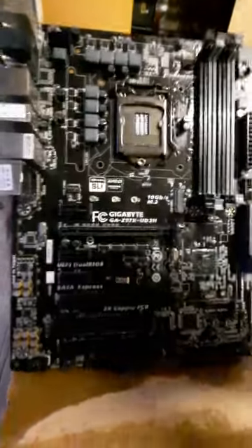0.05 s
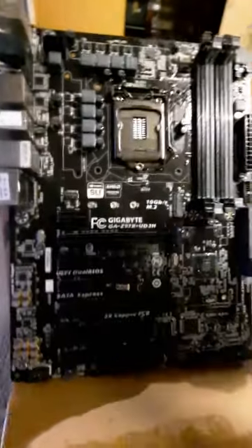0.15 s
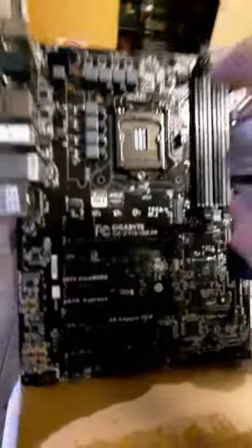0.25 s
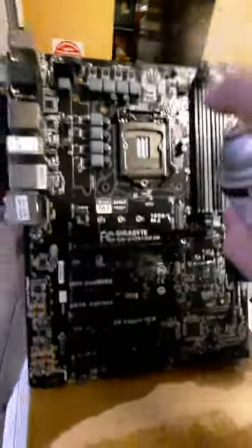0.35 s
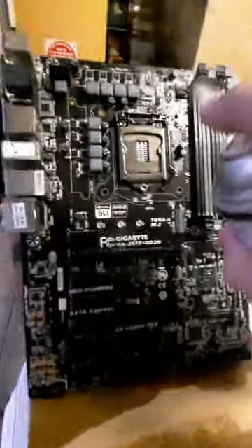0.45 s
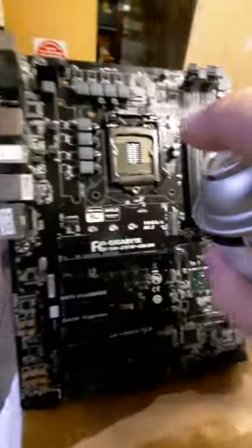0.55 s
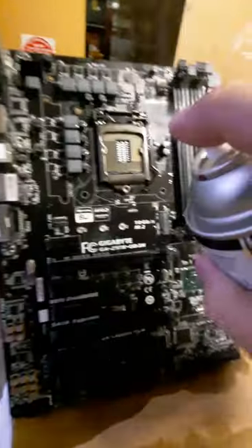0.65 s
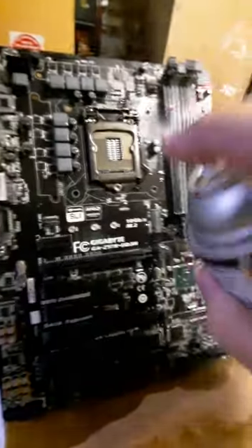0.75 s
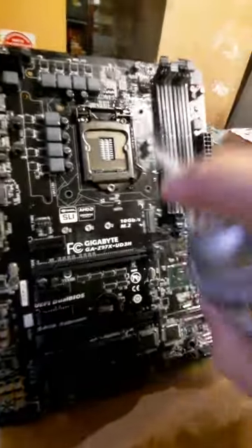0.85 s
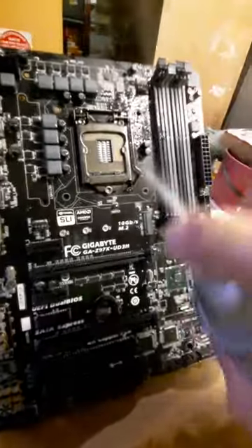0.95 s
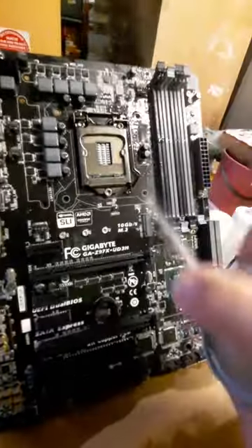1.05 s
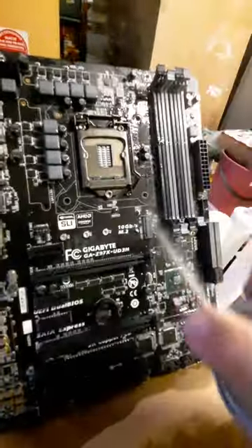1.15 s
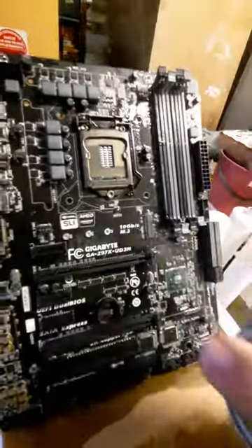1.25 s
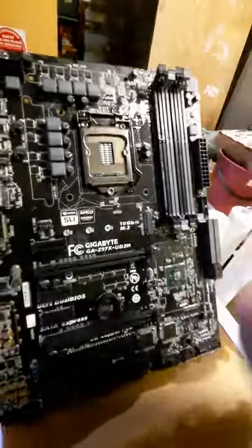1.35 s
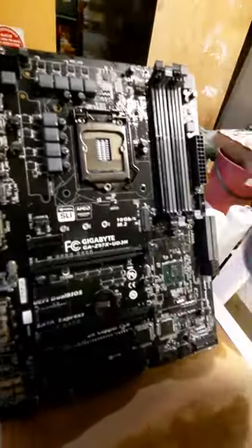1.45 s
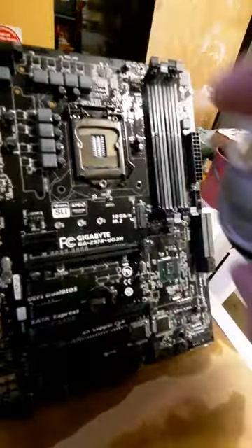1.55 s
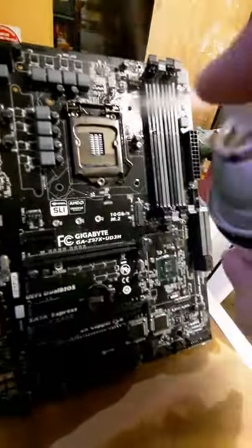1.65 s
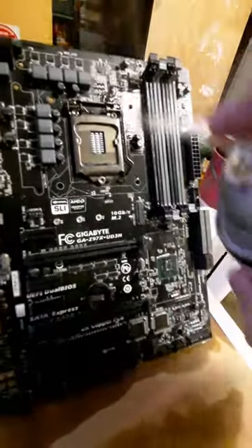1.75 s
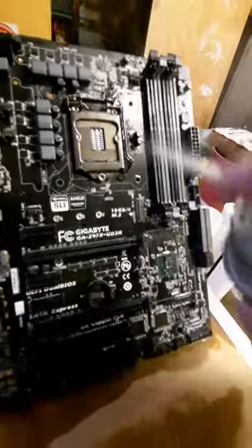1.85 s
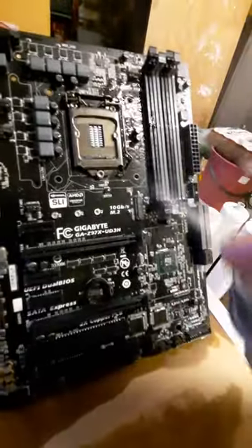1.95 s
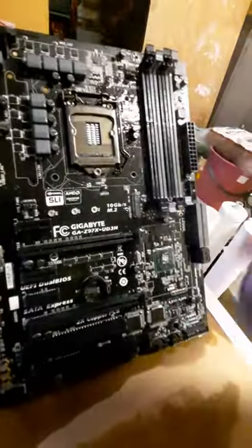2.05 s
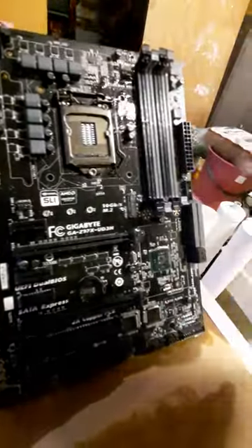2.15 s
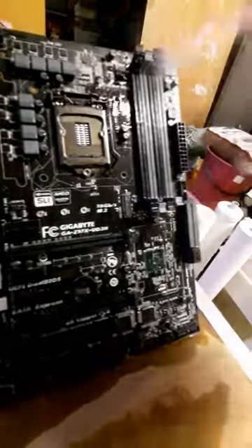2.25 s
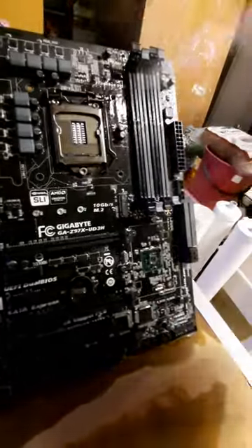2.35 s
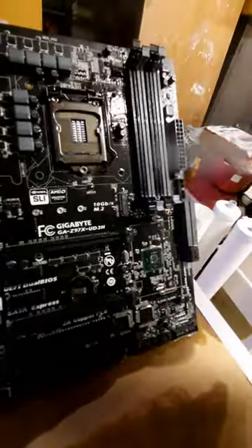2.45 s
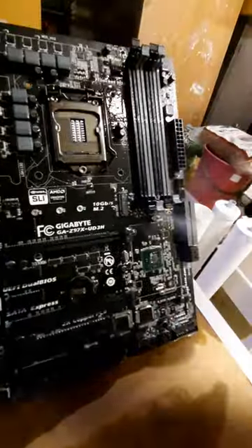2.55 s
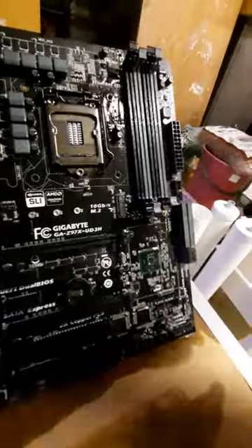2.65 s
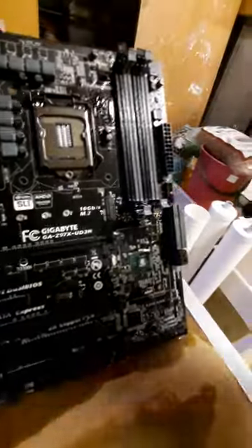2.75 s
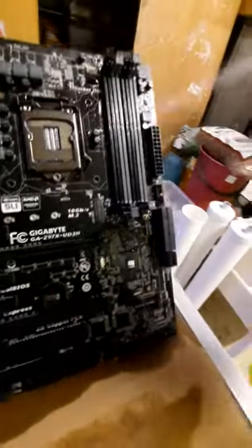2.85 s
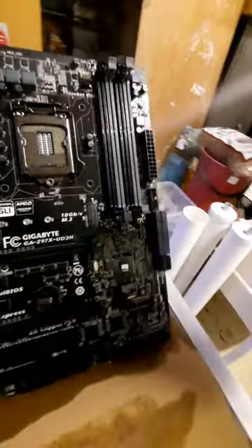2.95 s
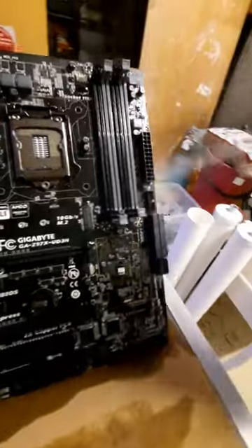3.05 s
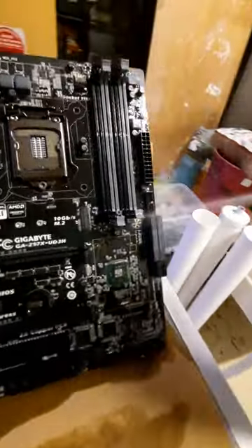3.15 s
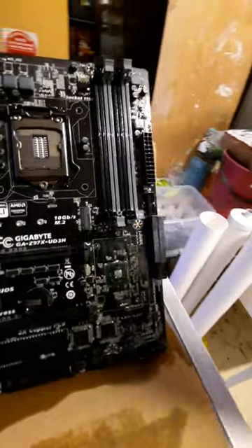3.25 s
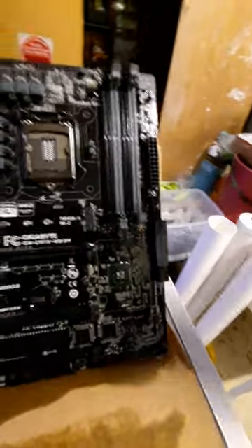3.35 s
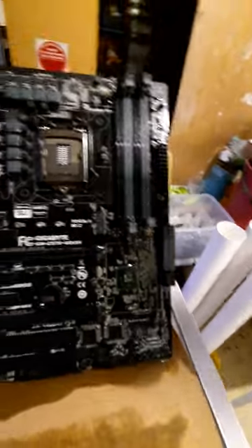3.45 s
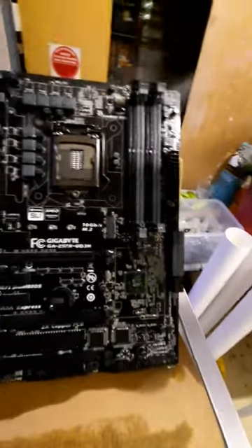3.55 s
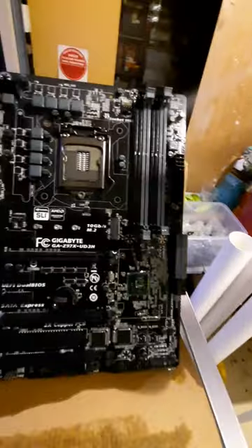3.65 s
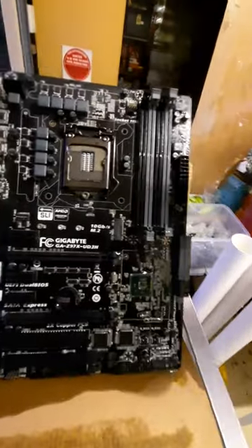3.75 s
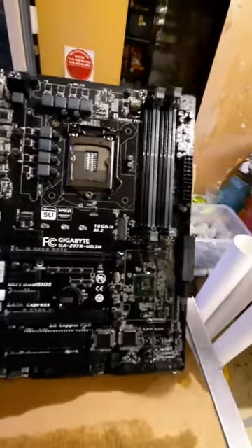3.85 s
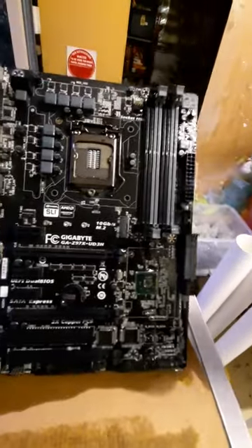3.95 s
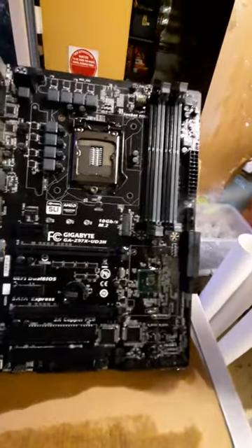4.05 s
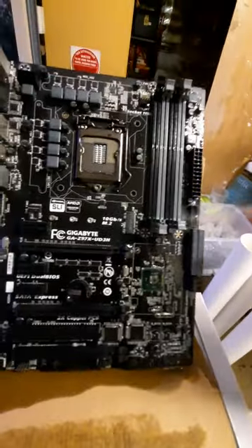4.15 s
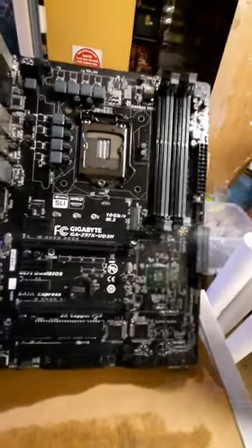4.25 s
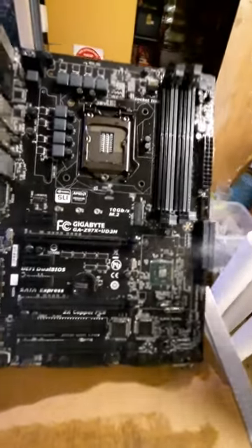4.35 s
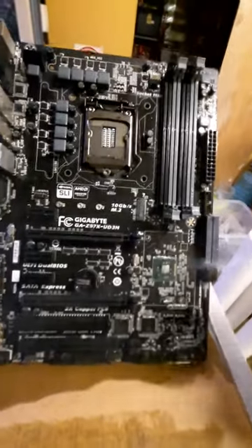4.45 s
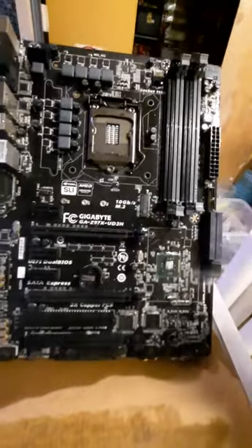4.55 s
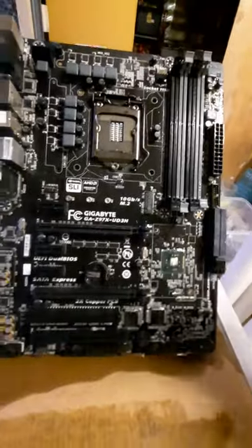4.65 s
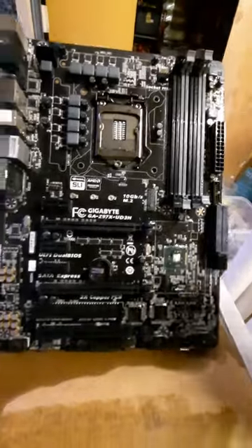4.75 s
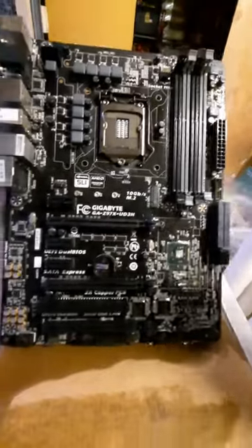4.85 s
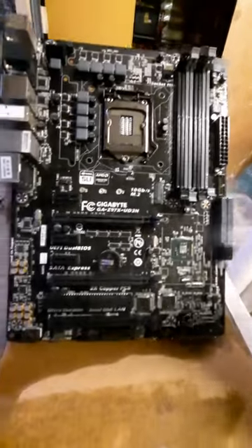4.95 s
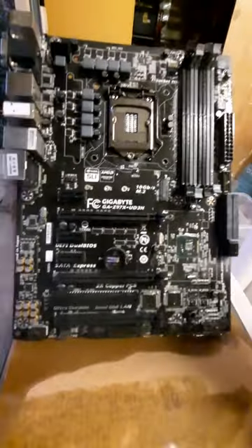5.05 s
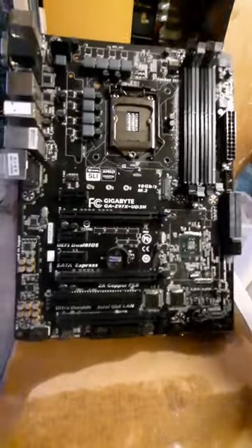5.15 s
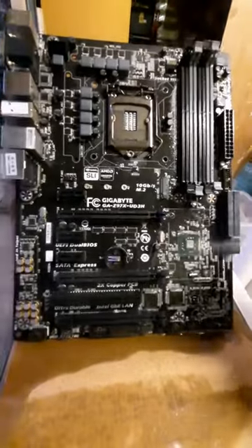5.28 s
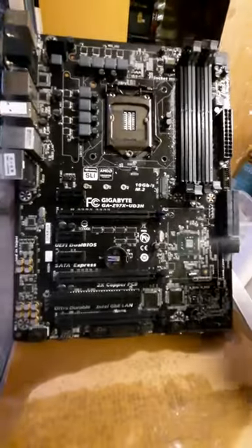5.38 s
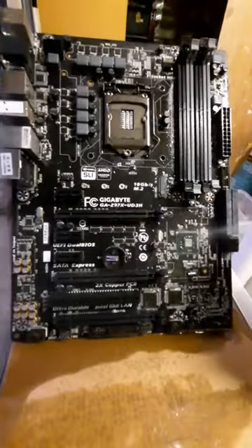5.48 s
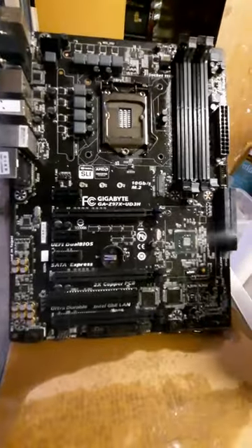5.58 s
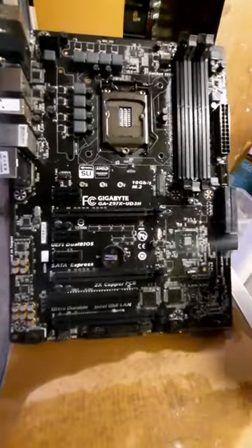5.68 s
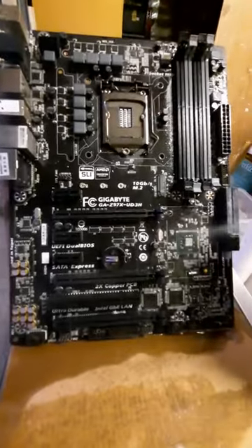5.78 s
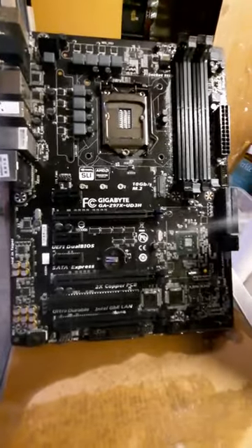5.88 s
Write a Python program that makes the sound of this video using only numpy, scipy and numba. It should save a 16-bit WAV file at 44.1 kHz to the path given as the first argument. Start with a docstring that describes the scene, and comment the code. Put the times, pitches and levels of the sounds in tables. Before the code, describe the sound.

A pressurised can sprays a circuit board in bright, breathy bursts with abrupt stops, light button ticks and faint bird-like whistles in a quiet room.

```python
"""In a small room, an aerosol cleaner is sprayed onto a circuit board in seven bursts, close to a phone.
Filtered noise forms the nozzle hiss, the rush over the parts, the slot tone and the rumble; two resonances drone.
Moving echoes comb the spray. Damped resonances tick and bump as the button, can and hands move.
Thin gliding tones whistle between and during bursts, perhaps a bird outside.
Soft coloured noise, a low hum and a faint fizz from the wet board lie beneath."""
import sys
import numpy as np
from scipy import signal
from scipy.fft import rfft, irfft
from scipy.io import wavfile
from scipy.ndimage import map_coordinates
from numba import njit

SR = 44100
rng = np.random.default_rng(int(sys.argv[2]) if len(sys.argv) > 2 else 0)


def store_pcm(level_fs):
    """Save levels as 16-bit WAV."""
    pcm = np.round(np.clip(level_fs, -1, 1) * 32767).astype(np.int16)
    wavfile.write(sys.argv[1], SR, np.atleast_2d(pcm).T)


N = 261072
TIME = np.arange(N) / SR  # [s]
FREQ = np.maximum(np.arange(N // 2 + 1) * SR / N, 1)  # [Hz]

# Button strokes; levels (before the layer trims in spray) and pitches are those at mid-stroke:
# (opens [s], closes [s], rise time [s], fall time constant [s], nozzle hiss [dB], hiss swell over the stroke [dB],
#  rush on the board [dB], rush swell [dB], hollow tone of the slots [dB], slots swell [dB], rumble [dB],
#  drone of the board [dB], hiss left minus right [dB], hiss centre [Hz], hiss glide over the stroke [Hz],
#  rush centre [Hz], slots centre [Hz])
STROKES = [(0.26, 1.256, 0.05, 0.013, -29.5, 6, -31, 6, -45.5, 4, -51.5, -55.5, 0.4, 12730, 600, 6300, 2130),
           (1.58, 2.026, 0.021, 0.015, -28.5, 2.5, -29.5, -2.5, -49, 8, -45, -51, 4, 12550, -800, 6100, 2750),
           (2.251, 2.587, 0.015, 0.017, -29, 3, -30.5, -3.5, -47, 3, -49.5, -55.5, 2, 13200, -1200, 6050, 2300),
           (2.869, 3.197, 0.018, 0.017, -30, 2.5, -34, -1.5, -49, 4.5, -52.5, -49.5, -1.5, 11700, -400, 5300, 2620),
           (3.551, 4.589, 0.0097, 0.014, -29, 3.5, -35, -2, -47.5, 6, -57, -53, -1.5, 11350, -500, 5400, 2530),
           (4.833, 5.073, 0.011, 0.015, -30.5, -0.5, -37, 6, -48, 9.5, -54.5, -52, -2, 12600, -300, 5070, 1950),
           (5.224, 6.02, 0.012, 0.014, -28.5, 2.5, -36.5, 0, -48, -1.5, -54.5, -55.5, 1.5, 12500, 0, 6300, 2690)]
# Colour of the spray: (frequency [Hz], left gain [dB], right gain [dB])
SPRAY_COLOUR = [(131, -22.5, -41), (322, -16.5, -21), (693, -7, -12.5), (1095, -11, -14.5),
                (1830, -3.5, -5), (3880, -6, -5.5), (4830, -12, -10), (6140, -20, -7), (8230, -33, -9.5),
                (9420, -34.5, -14), (11080, -20.5, -5.5), (11600, -29, -3), (12150, -15.5, -7),
                (15400, -11.5, -2.5)]
# The jet crosses a hollow between the parts and the rumble surges: (time [s], lift [dB], half length to 1/e [s])
RUMBLE_SURGES = [(0.669, 10, 0.23), (1.075, 10.5, 0.15), (2.586, 5, 0.028), (3.04, 5.5, 0.084),
                 (3.193, 11, 0.062), (4.1, 12, 0.45), (4.894, 5.5, 0.11), (5.5, 1, 0.037)]
# The nozzle swings and the hiss flares towards the phone or dips: (time [s], lift [dB], half length to 1/e [s])
HISS_FLARES = [(0.95, 3.5, 0.13), (2.51, 2.5, 0.029), (3.575, -2, 0.0069), (4.56, 4, 0.022),
               (4.99, 4.5, 0.098), (5.248, -2, 0.0095)]
# Path difference between the microphone ports: (time [s], later arrival at the right port [s])
PORT_LAGS = [(.3, 0.00026), (2.5, 0.00024), (3.6, 0.00019), (5.9, 0.000023)]
# Ticks of the button and can, before panning:
# (time [s], level [dB], ring [Hz], t60 [s], half-width as a share of the ring frequency [0-1])
BUTTON_TICKS = [(.061, -49, 6900, 0.027, 0.15), (1.364, -57, 8000, 0.02, 0.5),
                (2.160, -66, 7000, 0.015, 0.5), (2.242, -57, 7000, 0.02, 0.46),
                (2.710, -58, 7000, 0.015, 0.5), (2.848, -57, 5600, 0.028, 0.3),
                (2.880, -35, 11100, 0.0089, 0.4), (3.348, -56, 6000, 0.011, 0.6),
                (3.470, -63, 10500, 0.04, 0.4), (3.480, -55, 5600, 0.063, 0.28),
                (3.536, -45, 5000, 0.0079, 0.2), (4.821, -57, 8700, 0.025, 0.6),
                (5.213, -56, 5140, 0.019, 0.3)]
# Soft handling bumps: (time [s], level [dB], ring [Hz], t60 [s], half-width as a share of the ring frequency [0-1])
HANDLING_BUMPS = [(.022, -44.5, 272, 0.3, 0.77), (.44, -54, 64, 0.45, 0.49)]
# Whistles, before panning: (airy share [0-1], drift rate of the air [1/s], path of (time [s], pitch [Hz], level [dB]))
WHISTLE_PATHS = [(0.66, 200, [(2.595, 1790, -44), (2.635, 1940, -42.5), (2.665, 2120, -46),
                 (2.71, 2080, -56), (2.78, 1700, -63)]), (0.8, 170, [(2.61, 2500, -61), (2.652, 2430, -50),
                 (2.69, 2400, -64)]), (0.46, 230, [(3.20, 1480, -53), (3.30, 1494, -54),
                 (3.43, 1530, -68)]), (0.049, 380, [(3.33, 3070, -61), (3.38, 3135, -48), (3.40, 3120, -48),
                 (3.425, 3150, -45.5), (3.485, 3200, -54), (3.50, 3220, -41), (3.515, 3240, -54),
                 (3.565, 3260, -54)]), (0.25, 220, [(3.90, 2560, -52), (3.965, 2535, -45),
                 (3.995, 2440, -37), (4.04, 2365, -33), (4.065, 2385, -37), (4.09, 2460, -35),
                 (4.122, 2530, -42), (4.155, 2475, -33), (4.20, 2270, -38), (4.24, 2140, -46)]),
                 (0.95, 420, [(4.21, 2480, -40), (4.35, 2350, -48.5), (4.47, 2295, -39.5),
                 (4.57, 2280, -50), (4.68, 2320, -48), (4.76, 2330, -60)]), (0.27, 190, [(4.53, 2440, -50),
                 (4.578, 2565, -37), (4.603, 2470, -39.5), (4.65, 2532, -38.5), (4.70, 2484, -44.5),
                 (4.75, 2545, -49), (4.77, 2520, -62), (4.89, 2540, -62)])]
# Colour of the room noise: (frequency [Hz], left gain [dB], right gain [dB])
ROOM_COLOUR = [(25, -33, -22), (65, -6.5, -6), (195, -22, -43), (293, -2.5, 0.5), (610, -4, -7),
               (910, 1, -2.5), (2140, -4.5, -2), (3160, -9, -17), (6300, -24.5, -13.5), (9700, -62, -22.5),
               (11900, -48, -20.5), (15600, -52, -27)]
# Room noise before a -2 dB trim: (time [s], level [dB])
ROOM_NOISE_LEVEL = [(0, -44), (.2, -46), (1.33, -44.5), (1.41, -45), (1.55, -46.5), (2.2, -47),
                    (2.76, -48.5), (2.83, -46), (3.3, -47.5), (3.52, -47.5), (4.2, -44), (4.75, -53),
                    (5.2, -51), (5.92, -53.5)]

# The hand is never quite still: drift rate [1/s] and spread of the two centres [Hz]
WANDER_PER_S, HISS_WANDER_HZ, RUSH_WANDER_HZ = 11, 250, 130
# Over each stroke the hand closes in: the rush rises and the slots sink in pitch
RUSH_GLIDE_HZ, SLOTS_GLIDE_HZ = 500, -250
SHIMMER_DB, SHIMMER_PER_S, SHIMMER_BAND_HZ = 1.6, 30, 550
# Resonance widths here are half-widths at -6 dB
DRONE_HZ, DRONE_WIDTH_HZ = 316, 51
BODY_HZ, BODY_WIDTH_HZ, BODY_DB = 137, 146, -8  # deep body of the drone, level relative to its main ring
DRONE_SURGE_SHARE = 0.81  # how much of a surge, in dB, reaches the drone
WHISTLE_WAVER_HZ, WHISTLE_WAVER_PER_S, WHISTLE_FLUTTER_DB = 7, 90, 1.2
WHISTLE_EDGE_S = 0.016
HUM_HZ, HUM_WIDTH_HZ, HUM_DB = 141, 35, -68
FIZZ_DB, FIZZ_DRY_DB_PER_S = -82, 26  # before panning; the fizz weakens as the board dries after each burst
ROOM_T60_S, ROOM_DB = 0.24, -20.5
TOP_HZ = 15800


def spray(flutter_db=0.08, spit_db=0.5, churn_db=1.8, sway_db=0.9):
    """Turbulence: gas hisses at the nozzle, rushes over the parts, blows across the slots and rumbles on the board."""
    _, place, settings = strokes()
    (hiss_db, hiss_swell, rush_db, rush_swell, slots_db, slots_swell, rumble_db, drone_db, aim_db,
     hiss_hz, hiss_glide_hz, rush_hz, slots_hz) = settings
    surge_db = bumps(RUMBLE_SURGES)
    hiss_hz = hiss_hz + hiss_glide_hz * place + HISS_WANDER_HZ * walk(WANDER_PER_S)
    rush_hz = rush_hz + RUSH_GLIDE_HZ * place + RUSH_WANDER_HZ * walk(WANDER_PER_S)
    slots_hz = slots_hz + SLOTS_GLIDE_HZ * place
    hiss_db = hiss_db + hiss_swell * place + bumps(HISS_FLARES) + sway_db * walk(WANDER_PER_S)

    lag_s, = curves(PORT_LAGS)
    left, right = stereo_noise(600, shared=.45)
    combed = np.array([near_surfaces(left), near_surfaces(delay(right, lag_s))])
    gas = rfft(colour(combed, SPRAY_COLOUR))
    # differences of low-pass gains leave four adjoining bands
    bands = np.diff([below(143), below(1770), below(4710), below(7700), np.ones_like(FREQ)], axis=0)
    rumble, slots, rush, hiss = (irfft(gas * band, N) for band in bands)

    hiss = brighten(shimmer(hiss), hiss_hz, width_hz=4200, gain=1.64)
    hiss = hiss * undb(hiss_db + 3.5) * pan(aim_db)
    # droplets make the impact more ragged than the nozzle
    spit = spit_db * walk(220)
    rush = brighten(rush, rush_hz, width_hz=1700, gain=1.0)
    rush = rush * undb(rush_db + rush_swell * place - 1.5 + spit)
    slots = brighten(slots, slots_hz, width_hz=790, gain=1.0)
    slots = slots * undb(slots_db + slots_swell * place + 6.0 + spit)
    rumble = unit(rumble) * undb(rumble_db + surge_db + 4.5 + churn_db * walk(60))

    body = narrow_noise(BODY_HZ, BODY_WIDTH_HZ) * undb(BODY_DB)
    drone = narrow_noise(DRONE_HZ, DRONE_WIDTH_HZ) + body
    drone = drone * undb(drone_db + DRONE_SURGE_SHARE * surge_db - 4.0)
    return (hiss + rush + slots + rumble + drone) * valve() * undb(flutter_db * walk(120))


def valve(spurt=0.3, spurt_s=0.0014):
    """Flow control: each opening ramps up with a slight early spurt, then decays as the nozzle empties."""
    flow = 0
    for on, off, rise, fall, *_ in STROKES:
        age = np.maximum(TIME - on, 0)
        opening = np.clip(age / rise, 0, 1) * (1 + spurt * np.exp(-age / spurt_s))
        flow = flow + opening * np.exp(-np.maximum(TIME - off, 0) / fall)
    return flow


def strokes():
    """Timing: seconds since closing (0 until then), place in the stroke (-.5 to .5), settings of the latest stroke."""
    rows = np.array(STROKES)
    latest = np.maximum(np.searchsorted(rows[:, 0], TIME) - 1, 0)
    on, off, rise, fall, *settings = rows[latest].T
    place = np.clip((TIME - on) / (off - on), 0, 1) - .5
    return np.maximum(TIME - off, 0), place, settings


def near_surfaces(x, echo_gain=0.34, echo_fade_s=0.0056):
    """Comb filtering: echoes from board, can, hand and bench vary in strength and carve uneven hollows."""
    lags_s = (.00058, .00085, .00115, .0016, .0021, .0027, .0035, .0046)
    treble = irfft(rfft(x) * (1 - below(1540)), N)  # small surfaces reflect only short waves
    echoes = 0
    for lag in lags_s:
        echo = (.6 + .8 * walk(11)) * delay(treble, lag + .00003 * walk(4))
        echoes = echoes + np.exp((lags_s[0] - lag) / echo_fade_s) * echo
    return x + echo_gain * echoes


def shimmer(hiss):
    """Independent band modulation: each narrow band at the top of the hiss swells and sinks by itself."""
    spectrum, out = rfft(hiss), hiss
    for hz in np.arange(10500, TOP_HZ, SHIMMER_BAND_HZ):
        triangle = np.maximum(1 - np.abs(FREQ - hz) / SHIMMER_BAND_HZ, 0)
        band = irfft(spectrum * triangle, N)
        out = out + band * (undb(SHIMMER_DB * walk(SHIMMER_PER_S)) - 1)
    return out


def brighten(pair, hz, width_hz, gain):
    """Cavity resonance: gaps between the parts pick out a band that moves with the aim; rms is set to 1."""
    return unit(pair + gain * np.array([resonance(x, hz, float(width_hz)) for x in pair]))


@njit
def resonance(x, hz, width):
    """Second-order resonance: a state-variable band-pass with a moving centre."""
    y, band, low = np.empty(len(x)), 0., 0.
    for i in range(len(x)):
        g, damping = np.tan(np.pi * hz[i] / SR), width / hz[i]
        v = (band + g * (x[i] - low)) / (1 + g * (g + damping))
        band, low, y[i] = 2 * v - band, low + 2 * g * v, damping * v
    return y


def knocks(rows):
    """Damped resonance: brief noisy blows decay exponentially; a hard click is wide, a soft one narrow."""
    out = 0
    for s, db, hz, t60, width in rows:
        decay = (TIME >= s) * np.exp(-np.log(1000) * np.maximum(TIME - s, 0) / t60)
        out = out + narrow_noise(hz, width * hz) * undb(db) * decay
    return out


def whistles():
    """Frequency modulation: thin gliding tones waver and flutter; part of each is a band of air around the pitch."""
    out = 0
    waver_hz = WHISTLE_WAVER_HZ * walk(WHISTLE_WAVER_PER_S)
    flutter_db = WHISTLE_FLUTTER_DB * walk(WHISTLE_WAVER_PER_S)
    for airy, air_rate, path in WHISTLE_PATHS:
        hz, db = curves(path)
        air = (walk(air_rate) + 1j * walk(air_rate)) / np.sqrt(2)
        to_edge_s = np.minimum(TIME - path[0][0], path[-1][0] - TIME)
        shape = np.clip(to_edge_s / WHISTLE_EDGE_S, 0, 1)
        carrier = np.exp(2j * np.pi * np.cumsum(hz + waver_hz) / SR)
        tone = (np.sqrt(1 - airy) + np.sqrt(airy) * air) * carrier
        out = out + shape * undb(db + flutter_db) * tone.real
    return out * pan(11.6)


def room_noise(grain_db=3):
    """Noise superposition: a soft wash of changing level, a low hum and the fine fizz of cleaner boiling off."""
    wash_db, = curves(ROOM_NOISE_LEVEL)
    wash = unit(colour(stereo_noise(640), ROOM_COLOUR)) * undb(wash_db - 2.0)
    drying_s, _, _ = strokes()
    fizz_db = FIZZ_DB - FIZZ_DRY_DB_PER_S * drying_s + grain_db * walk(1300)
    fizz = np.array([narrow_noise(11500, 3000) for _ in range(2)]) * undb(fizz_db) * pan(-9.0)
    return wash + fizz + narrow_noise(HUM_HZ, HUM_WIDTH_HZ) * undb(HUM_DB)


def room(x, wet_db):
    """Diffuse reverberation: convolution with decaying noise, different in each channel."""
    t = TIME[:SR]
    tail = rng.standard_normal((2, SR)) * np.exp(-np.log(1000) * t / ROOM_T60_S) * (t > .005)
    tail = unit(tail) / np.sqrt(SR)
    return x + undb(wet_db) * signal.fftconvolve(x, tail, axes=1)[:, :N]


def stereo_noise(alike_hz, shared=0):
    """Interchannel coherence: two noises nearly alike in the bass keep only a share in common above."""
    mid, side = rfft(rng.standard_normal((2, N)))
    alike = shared + (.88 - shared) / (1 + (FREQ / alike_hz) ** 4)
    return irfft(mid * np.sqrt(1 + alike) + np.array([[1], [-1]]) * side * np.sqrt(1 - alike), N)


def narrow_noise(hz, width):
    """Resonant filtering: noise in one band with steep skirts, half-width given at -6 dB, rms 1."""
    gain = 1 / (1 + ((FREQ / hz - hz / FREQ) * hz / (2 * width)) ** 2)
    return unit(irfft(rfft(rng.standard_normal(N)) * gain, N))


def colour(x, table):
    """Spectral shaping: each channel takes gains joined by straight lines in dB over log frequency."""
    hz, *sides = np.transpose(table)
    gains = undb([np.interp(np.log(FREQ), np.log(hz), db) for db in sides])
    return irfft(rfft(x) * gains, N)


def below(hz):
    """Band splitting: the gain of a steep low-pass."""
    return 1 / (1 + (FREQ / hz) ** 8)


def delay(x, lag_s):
    """Propagation delay: read a sound through a moving lag."""
    return map_coordinates(x, [np.arange(N) - lag_s * SR], order=3, mode="wrap")


def walk(rate):
    """Random modulation: smooth drift through `rate` random knots a second, with a spread near 1."""
    knots = rng.standard_normal(4096)
    return map_coordinates(knots, [TIME * rate], order=2, mode="wrap")


def bumps(rows):
    """Gaussian envelopes: smooth passing changes in level, in dB."""
    return sum(db * np.exp(-((TIME - s) / half_s) ** 2) for s, db, half_s in rows)


def curves(rows):
    """Linear interpolation: each column of a table of times, joined by straight lines."""
    s, *columns = np.transpose(rows)
    return [np.interp(TIME, s, c) for c in columns]


def pan(db):
    """Interchannel level difference: left and right gains for left minus right in dB."""
    return undb(np.array([[.5], [-.5]]) * db)


def undb(db):
    """Logarithmic level: decibels to amplitude gain."""
    return 10 ** (np.asarray(db) / 20)


def unit(x):
    """Normalization: scale to rms 1."""
    return x / np.sqrt(np.mean(x ** 2))


def scene():
    """Superposition: the can and hand are near; the whistles are further off and wetter."""
    near = spray() + knocks(BUTTON_TICKS) * pan(-16.5) + knocks(HANDLING_BUMPS)
    far = room(whistles(), wet_db=-12)
    return room(near, ROOM_DB) + far + room_noise()


def record(dry):
    """Band limiting: the phone drops the deepest bass and cuts the top steeply."""
    lean = signal.sosfilt(signal.butter(2, 35, "high", fs=SR, output="sos"), dry)
    return signal.sosfilt(signal.ellip(12, .2, 75, TOP_HZ, fs=SR, output="sos"), lean)


dry = scene()
out = record(dry)
store_pcm(out)
```